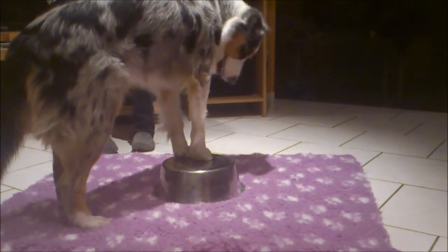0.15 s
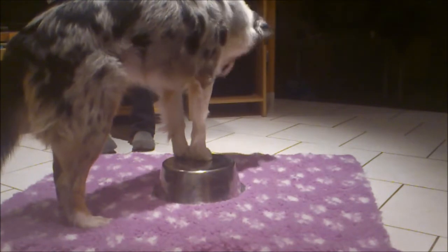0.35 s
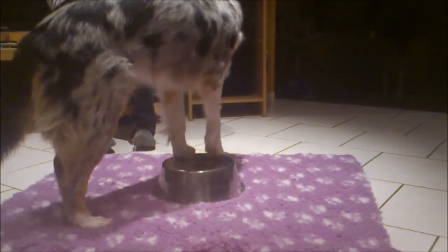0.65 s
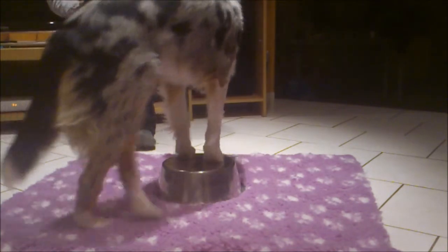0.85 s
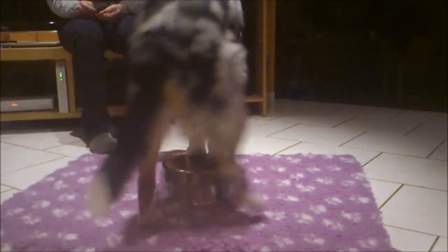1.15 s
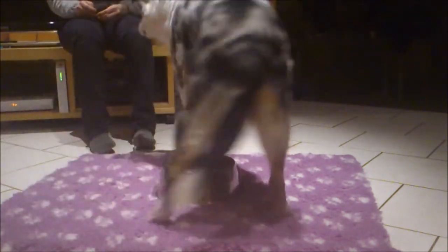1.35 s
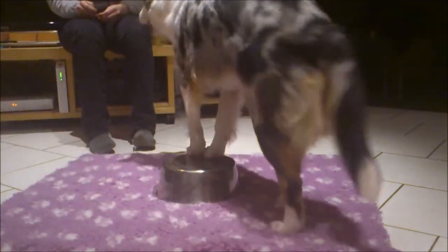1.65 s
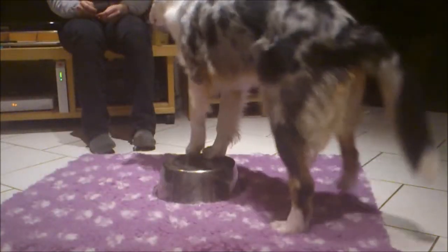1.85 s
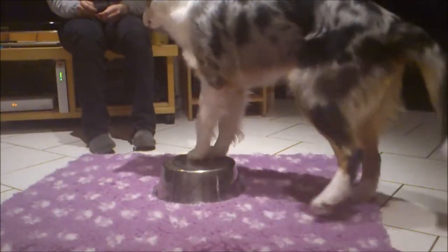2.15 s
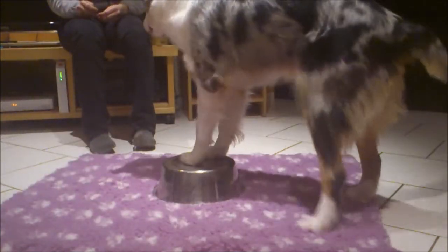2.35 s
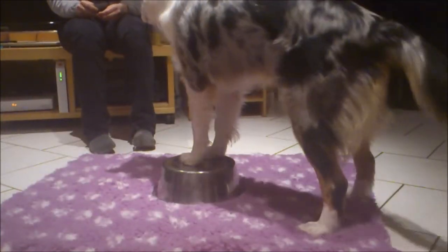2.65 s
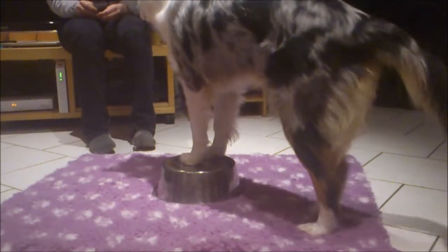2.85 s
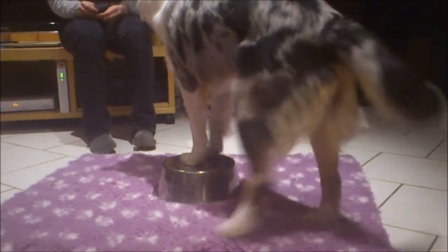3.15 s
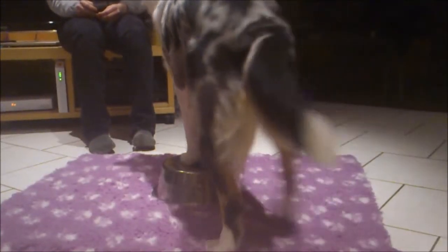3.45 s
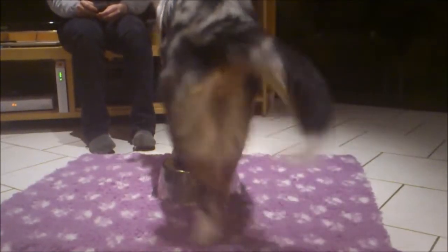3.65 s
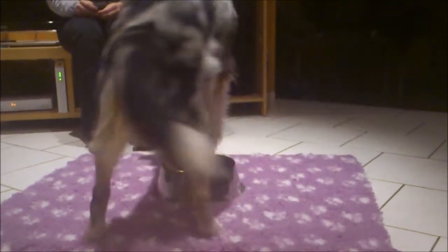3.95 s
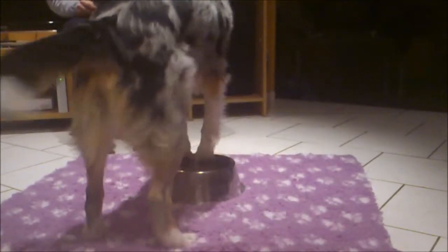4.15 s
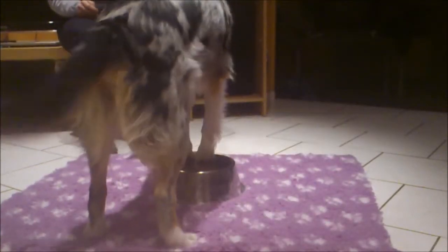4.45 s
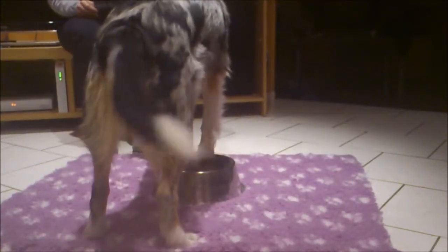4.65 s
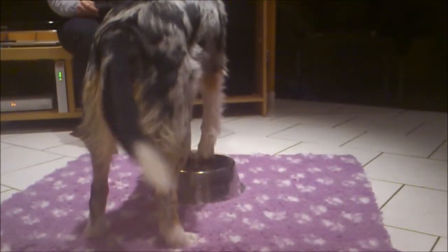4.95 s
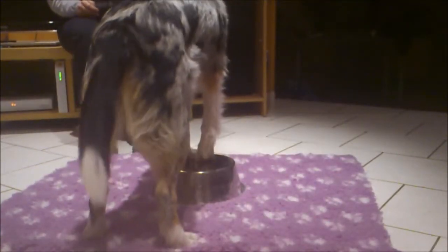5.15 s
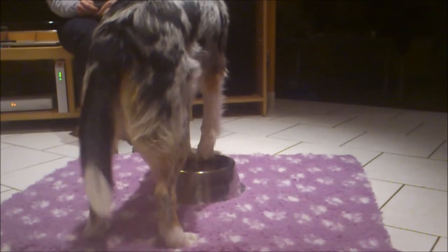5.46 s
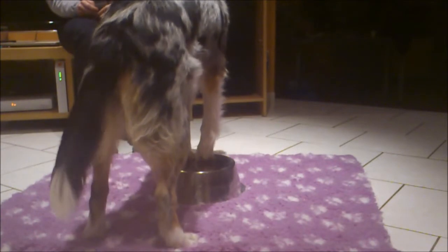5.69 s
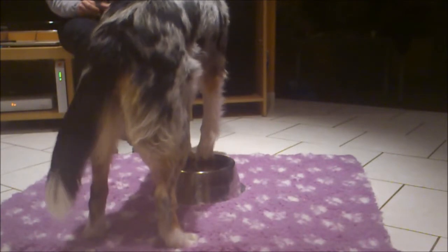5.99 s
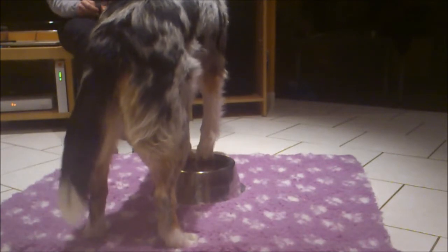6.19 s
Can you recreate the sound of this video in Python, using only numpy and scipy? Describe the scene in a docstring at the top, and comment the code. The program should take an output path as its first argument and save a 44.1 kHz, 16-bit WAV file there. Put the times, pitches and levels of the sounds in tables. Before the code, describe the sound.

Faint metallic claw taps and dull bowl knocks as a dog circles indoors, broken by a very loud, sharp double click close by.

```python
"""In a tiled room, a dog circles with its front paws on an upturned steel bowl on a rug.
Claws tick and skid: noise grains ring the steel modes. Pads thud and the bowl knocks dully: short pushes.
Coat and paws brush faintly (uneven coloured noise) over steady rumble and hiss.
A training clicker snaps close by when pressed and let go: a creak and an impulse ring its modes.
Both snaps ring in the room and overload the microphone."""
import sys
import numpy as np
from scipy import signal
from scipy.fft import rfft, irfft, next_fast_len
from scipy.io import wavfile
from scipy.ndimage import map_coordinates

SR = 44100
rng = np.random.default_rng(int(sys.argv[2]) if len(sys.argv) > 2 else 0)


def inscribe(sig):
    """Save sig as 16-bit PCM at rate SR to the path in sys.argv[1].

    A 1-D sig is mono; a 2-D sig holds one channel per row.
    Samples are clipped to [-1, 1] before scaling.
    """
    pcm = np.round(np.clip(np.atleast_2d(sig).T, -1, 1) * 32767)
    wavfile.write(sys.argv[1], SR, pcm.astype(np.int16))


N = 278926
LENGTH = 32768  # samples in one event
T = np.arange(LENGTH) / SR  # s within one event
HZ = np.fft.rfftfreq(LENGTH, 1 / SR)

# paws set down on the bowl: (time [s], claw level [dB], pad level [dB])
STEPS = [(0.215, -61, -77), (0.4909, -56.5, -73), (0.561, -45, -60), (1.281, -51.5, -73), (1.607, -46, -61),
         (1.928, -41, -54), (2.344, -58.5, -54), (3.376, -48.5, -49.5), (3.978, -39, -56.5),
         (6.285, -53, -76)]


def amp(db):
    """Amplitude ratio of a level in dB."""
    return 10 ** (np.asarray(db) / 20)


def unit(x):
    """x scaled to rms 1."""
    return x / np.sqrt(np.mean(x ** 2) + 1e-20)


def along(points, hz):
    """(Hz, value) points interpolated on a log frequency axis."""
    f, v = np.transpose(points)
    return np.interp(np.log(hz + 1), np.log(f + 1), v)


def filtered(x, response):
    """x filtered by response(hz), zero-padded by at least 0.5 s."""
    m = next_fast_len(N + SR // 2)
    spectrum = rfft(x, m) * response(np.fft.rfftfreq(m, 1 / SR))
    return irfft(spectrum, m)[..., :N]


def sides(points, hz):
    """Left and right gains from a left-minus-right dB curve."""
    half_db = along(points, hz) / 2
    return amp(np.outer([1, -1], half_db))


def wobble(rate_hz, size):
    """Smooth random curve with rate_hz knots a second."""
    knots = rng.standard_normal(size // 10)
    return map_coordinates(knots, [np.arange(size) * rate_hz / SR])


def ring(force, modes, low_hz, order):
    """Force through (Hz, width Hz, dB) modes of a body radiating weakly below low_hz; rms 1 over 10 ms."""
    body = 0
    for k, (mode_hz, width_hz, db) in enumerate(modes):
        damping = 1j * HZ * width_hz
        resonance = damping / (mode_hz * mode_hz - HZ * HZ + damping)
        body = body + (-1) ** k * amp(db) * resonance
    highpass = signal.butter(order, low_hz, 'high', fs=SR, output='sos')
    radiation = signal.sosfreqz(highpass, HZ, fs=SR)[1]
    sound = irfft(rfft(force) * body * radiation)
    return sound / np.linalg.norm(sound) * np.sqrt(SR / 100)


def diffuse(t60_scale, onset_s, alike):
    """Stereo reflection cloud, left energy 1; treble dies first, the close ports share a part."""
    # decay of the room before t60_scale: (frequency [Hz], t60 [s])
    room_t60 = [(200, 0.9), (1500, 0.81), (3300, 0.65), (4500, 0.54), (6000, 0.49), (10000, 0.32),
                (15000, 0.32)]
    hz, t, z = signal.stft(rng.standard_normal((3, LENGTH)), SR, nperseg=256)
    t60_s = t60_scale * along(room_t60, hz)[:, None]
    z = z * amp(-60 * t / t60_s)
    shared = np.clip(alike, 0, 1)
    mixed = np.sqrt(1 - shared) * z[:2] + np.sqrt(shared) * z[2]
    pair = signal.istft(mixed, SR, nperseg=256)[1][:, :LENGTH]
    pair = pair * (1 - np.exp(-(T / onset_s) ** 2))
    return pair / np.linalg.norm(pair[0])


def in_room(sound, echo_db, near_db, far_db, lead_s, alike):
    """Direct sound (left port leads), first echoes, quick scatter off the furniture and long tail."""
    # echoes from floor, furniture and walls, before echo_db: (delay [s], level [dB])
    first_echoes = [(.0035, -9), (.0067, -15), (.0085, 3), (.0120, -2.5), (.0165, -10), (.0220, -12),
                    (.0325, -16.5)]

    def arrival(delay_s, right_lag_s):
        return np.exp(-2j * np.pi * HZ * (delay_s + np.array([[0], [right_lag_s]])))

    paths = arrival(0, lead_s)
    for k, (delay_s, db) in enumerate(first_echoes):
        side = (-1) ** k  # from left and right in turn
        paths = paths + amp(db + echo_db) * arrival(delay_s, side * lead_s)
    near = amp(near_db) * diffuse(t60_scale=0.33, onset_s=0.0059, alike=alike)
    far = amp(far_db) * diffuse(t60_scale=0.84, onset_s=0.015, alike=alike)
    return irfft(rfft(sound) * (paths + rfft(near + far)))


def add(track, start_s, sound):
    """Lay a stereo sound on the track at start_s."""
    part = track[:, round(start_s * SR):][:, :LENGTH]
    part += sound[:, :part.shape[1]]


def hiss():
    """Steady room rumble and microphone hiss: noise with set spectrum, stereo likeness and tilt."""
    # relative noise density: (frequency [Hz], density [dB per Hz])
    noise_density = [(12, -34.5), (20, -4.5), (90, -2), (166, -4), (214, -5), (253, -7.5), (291, -5.5),
                     (334, -7.5), (617, -9), (690, -10.5), (1510, -11), (2100, -14.5), (2290, -15.5),
                     (5280, -18.5), (15700, -20.5)]
    # left-right correlation: (frequency [Hz], likeness [-1 to 1])
    likeness = [(60, 0.041), (180, 0.11), (550, 0.18), (1650, -0.031), (4970, 0.03), (15000, -0.08)]
    # stereo tilt: (frequency [Hz], left minus right [dB])
    noise_tilt = [(100, 0), (1000, -0.5), (1750, 4), (2700, -0.5), (5000, -1.5), (8000, -2.5), (10200, -2),
                  (12000, -1)]
    level_db = -61

    def colour(hz):
        angle = np.arccos(np.clip(along(likeness, hz), -1, 1)) / 2
        return amp(along(noise_density, hz)) * [np.cos(angle), np.sin(angle)]

    mid, side = filtered(rng.standard_normal((2, N)), colour)
    pair = np.array([mid + side, mid - side])
    pair = filtered(pair, lambda hz: sides(noise_tilt, hz))
    return amp(level_db) * unit(pair)


def brushing():
    """Fur and pads rub bowl and rug in faint, uneven strokes that swell while the dog walks round."""
    # walks round the bowl: (middle [s], length [s], brushing gain [dB])
    turns = [(1.5, 1.5, 7), (4.402, 1.4, 7.5)]
    standing_db, stroke_db = -74.5, 2.0
    strokes = wobble(22, size=N)
    grains = rng.standard_normal((2, N)) * amp(5.5 * rng.standard_normal(N))
    # (frequency [Hz], gain [dB])
    colour = [(100, -17.5), (400, 1.5), (1500, -2.5), (2600, -2.0), (4200, -1.0), (7000, -3.0),
              (9800, -2.5), (12500, -14.5), (16000, -17)]
    rub = unit(filtered(grains, lambda hz: amp(along(colour, hz))))
    time_s = np.arange(N) / SR
    walking_db = sum(db * np.exp(-(2 * (time_s - middle_s) / length_s) ** 2)
                     for middle_s, length_s, db in turns)
    return rub * amp(standing_db + walking_db + stroke_db * strokes)


def claws():
    """Claws catch and slip in tiny grains that ring the steel: briefly at each step, longer in a slide."""
    # bowl modes, damped by paws and rug: (frequency [Hz], width [Hz], level [dB])
    bowl_modes = [(787.3, 520, -16), (1550, 360, -5.5), (2000, 500, -6), (2660, 480, -7.5),
                  (3430, 560, -1.5), (3815, 450, 2.5), (4220, 400, 3.5), (4818, 500, 0.5),
                  (5780, 1500, -2.5), (7040, 970, -1.5), (8200, 610, -6.5), (9225, 520, -3),
                  (10250, 970, -4.5), (11250, 1300, -8.5), (14800, 1624, -13.5)]
    # paws sliding on the steel: (time [s], level [dB], length [s])
    skids = [(0.495, -60, 0.09), (0.56, -39.5, 0.075), (1.285, -49.5, .05), (1.327, -50, 0.015),
             (1.512, -67, 0.027), (2.449, -59.5, 0.022), (3.59, -56.5, 0.028), (3.861, -57.5, 0.014),
             (4.565, -57.5, 0.01), (4.845, -64, .02), (5.818, -66, 0.018)]
    catch_s, drag_s, drag_db = 0.005, 0.014, -12.5  # catches at once, then drags more softly
    skid_grows_db, skid_release_s = 5.5, 0.009  # louder as the paw is loaded, then lets go
    slip_rate_hz, slip_db = 170, 2  # uneven sticking and slipping
    track = np.zeros((2, N))
    landing = np.exp(-(T / catch_s) ** 2) + amp(drag_db) * np.exp(-(T / drag_s) ** 2)
    contacts = [(start_s, claw_db, landing) for start_s, claw_db, _ in STEPS]
    for start_s, db, length_s in skids:
        growth_db = skid_grows_db * np.minimum(T / length_s, 1)
        load_db = growth_db + slip_db * wobble(slip_rate_hz, size=LENGTH)
        release = np.exp(-np.maximum(T - length_s, 0) / skid_release_s)
        contacts.append((start_s, db, amp(load_db) * release))
    for start_s, db, pressure in contacts:
        grains = rng.standard_normal(LENGTH) * amp(5.3 * rng.standard_normal(LENGTH))
        tick = ring(grains * pressure, bowl_modes, low_hz=400, order=2)
        heard = in_room(tick, echo_db=-12.5, near_db=0.5, far_db=-3.5, lead_s=8e-5, alike=0.087)
        add(track, start_s, amp(db) * heard)
    return track


def weight():
    """Soft pads thud on the bowl; it knocks dully and rocks back once as the load shifts."""
    # loaded bowl on the rug: (frequency [Hz], width [Hz], level [dB])
    thud_modes = [(120, 90, -11), (248, 58, 1), (328.4, 110, -2)]
    # dull knocks as the weight shifts: (time [s], level [dB], pitch [Hz])
    knocks = [(0.245, -55.5, 1630), (0.665, -55.5, 1630), (0.740, -60, 1710), (1.528, -65, 1300),
              (1.716, -53.5, 1540), (2.344, -52, 1240), (2.468, -66, 1320), (3.376, -58.5, 744),
              (4.525, -58.5, 800), (5.020, -62.5, 717.4), (5.228, -60, 735)]
    slap_db, slap_hz, slap_width_hz = -6, 750, 700  # pad on steel, level relative to the thud
    rock_s, rock_db = 0.013, -5
    track = np.zeros((2, N))
    pad = np.exp(-T / 0.00073)
    slap = ring(pad, [(slap_hz, slap_width_hz, 0)], low_hz=400, order=2)
    thud = ring(pad, thud_modes, low_hz=70, order=2) + amp(slap_db) * slap
    for start_s, _, pad_db in STEPS:
        heard = in_room(thud, echo_db=-24.0, near_db=-2.5, far_db=-11.0, lead_s=8e-5, alike=0.7)
        add(track, start_s, amp(pad_db) * heard)
    push = np.exp(-T / 0.0003)
    rocking = push + amp(rock_db) * np.roll(push, round(rock_s * SR))
    for start_s, db, hz in knocks:
        modes = [(hz, 0.21 * hz, 0), (0.86 * hz, 0.14 * hz, -7), (1.8 * hz, 0.95 * hz, -19)]
        knock = ring(rocking, modes, low_hz=0.72 * hz, order=2)
        heard = in_room(knock, echo_db=-7.0, near_db=-2.0, far_db=-7.5, lead_s=8e-5, alike=0.32)
        add(track, start_s, amp(db) * heard)
    return track


def clicker():
    """The steel tongue creaks for an instant, then buckles: once when pressed, once when let go."""
    # tongue and shell, bent: (frequency [Hz], width [Hz], level [dB])
    pressed = [(1680, 140, -6), (1982, 230, -13), (3190, 550, -6), (4164, 430, -7), (5210, 720, 2.5),
               (5810, 370, 4.5), (6120, 520, -2), (8930, 480, -8.5), (9320, 110, -6.5), (10570, 600, 3.5),
               (13500, 1760, -6), (14726, 710, 0)]
    # tongue and shell, relaxed: (frequency [Hz], width [Hz], level [dB])
    relaxed = [(1640, 710, -10), (2770, 490, -9), (3280, 220, 4), (3390, 54, 7), (3468, 120, 1.5),
               (4080, 550, -2), (5870, 840, -1.5), (6930, 820, -1.5), (8740, 680, -8.5), (9894, 340, 4),
               (11330, 690, -5), (12470, 790, -2)]
    creak_s, creak_db = 0.003, -30.0
    track = np.zeros((2, N))
    for snap_s, db, modes in [(4.0299, -12, pressed), (4.2390, -11, relaxed)]:
        force = amp(creak_db) * rng.standard_normal(LENGTH) * (T < creak_s) * T / creak_s
        force[round(creak_s * SR)] += 1  # the buckling
        snap = ring(force, modes, low_hz=1285, order=5)
        heard = in_room(snap, echo_db=-4.0, near_db=5.0, far_db=0.5, lead_s=3e-5, alike=0.25)
        add(track, snap_s - creak_s, amp(db) * heard)
    return track


def scene():
    """Dog and clicker as the two microphone ports colour them, over the hiss."""
    # port colouring: (frequency [Hz], left minus right [dB])
    port_tilt = [(200, -1.5), (1000, 2), (1900, 8), (2500, 2.5), (3300, -1), (4500, -4.5), (6000, 2),
                 (7200, 5.5), (8300, 14), (9400, 18.5), (11300, 14.5), (13500, 7), (15500, 2.5)]
    sources = claws() + weight() + brushing() + clicker()
    return filtered(sources, lambda hz: sides(port_tilt, hz)) + hiss()


def record(dry):
    """The input stage clips the snaps; a steep low-pass sets the band limit."""
    ceiling, top_hz = 0.95, 15780
    clipped = dry / (1 + np.abs(dry / ceiling) ** 8) ** (1 / 8)
    return filtered(clipped, lambda hz: 1 / np.sqrt(1 + (hz / top_hz) ** 300))


dry = scene()
out = record(dry)
inscribe(out)
```